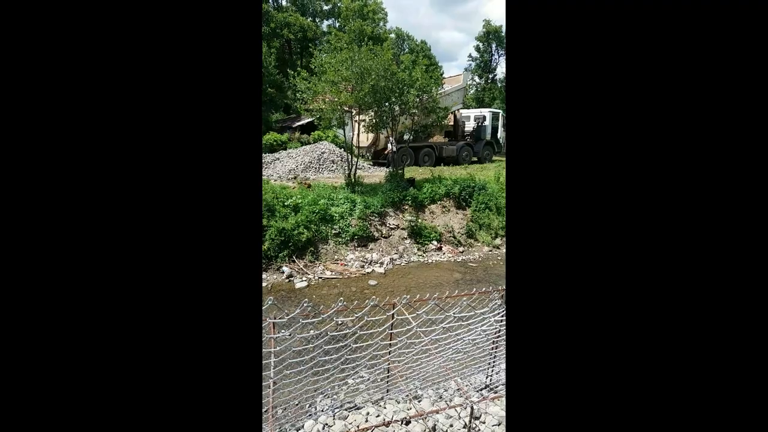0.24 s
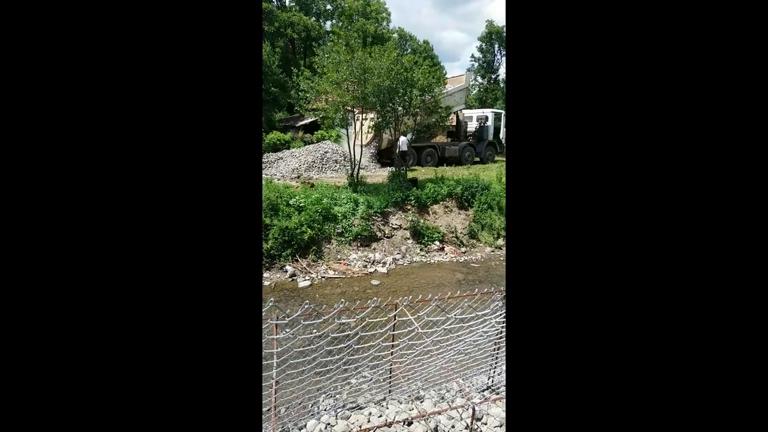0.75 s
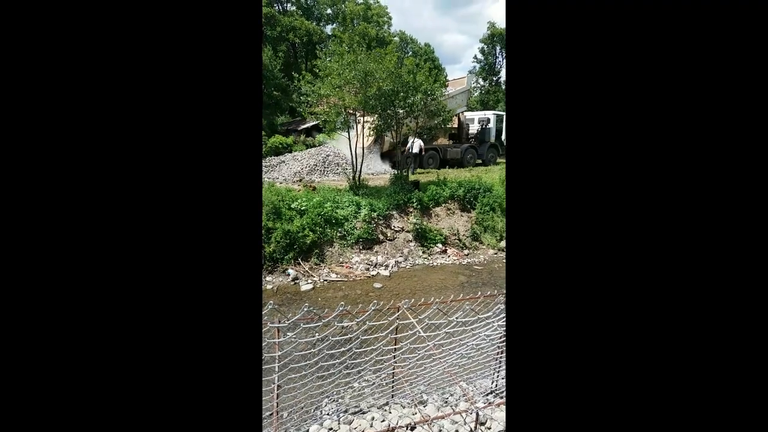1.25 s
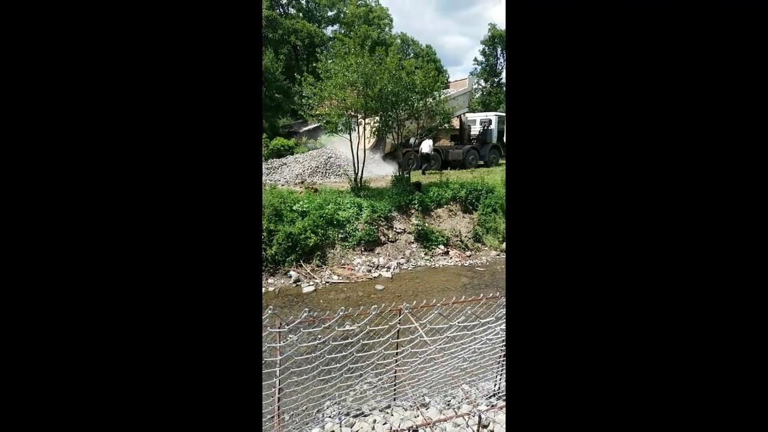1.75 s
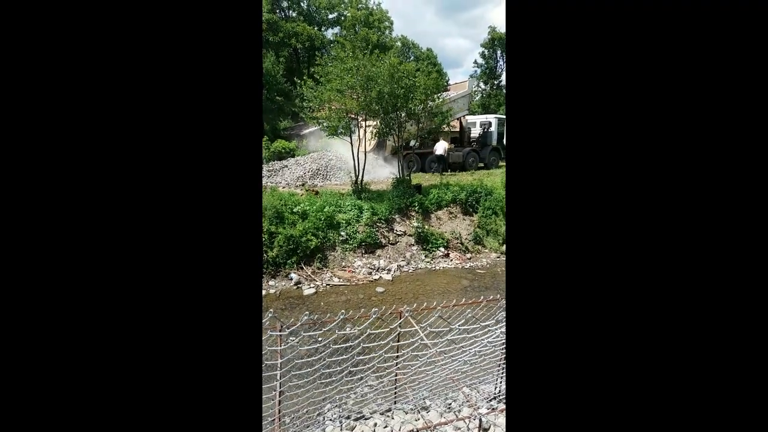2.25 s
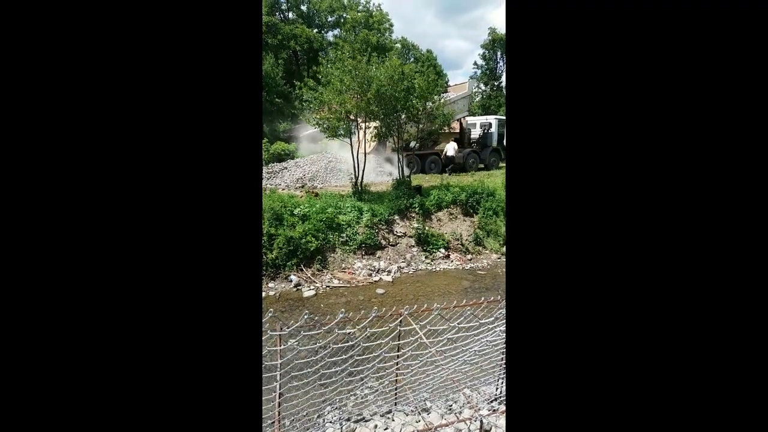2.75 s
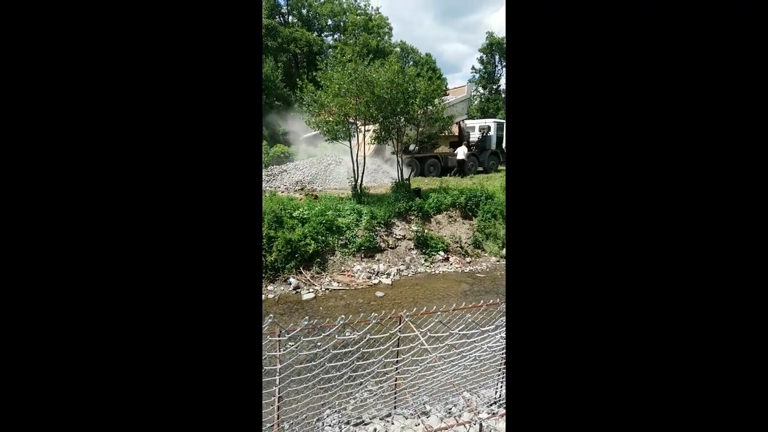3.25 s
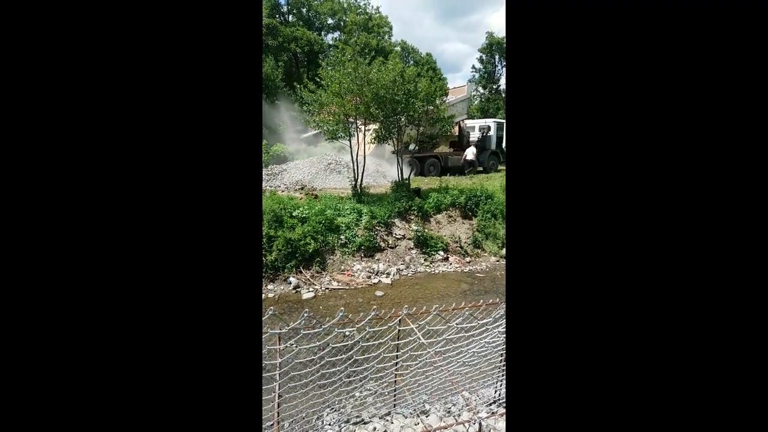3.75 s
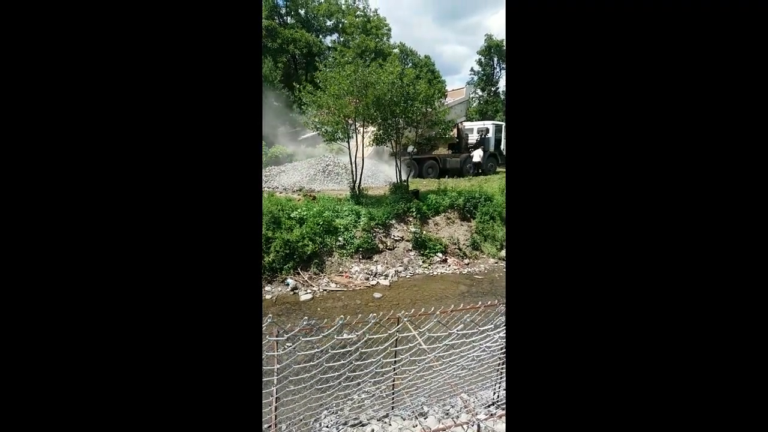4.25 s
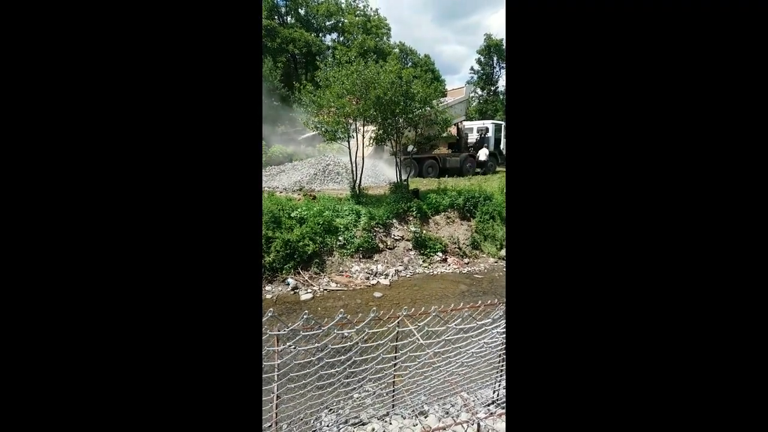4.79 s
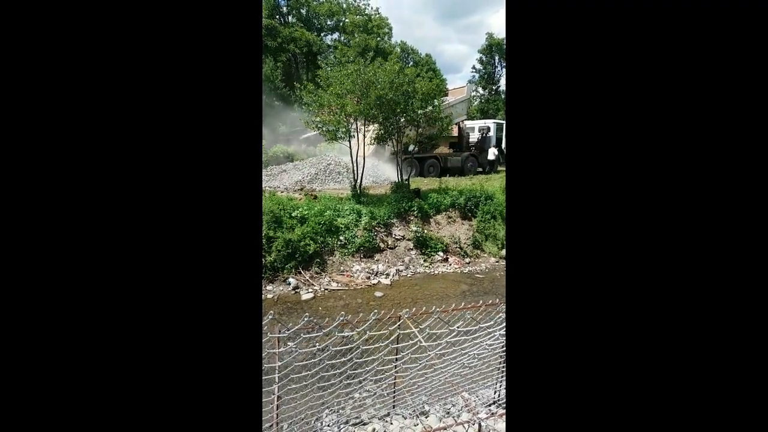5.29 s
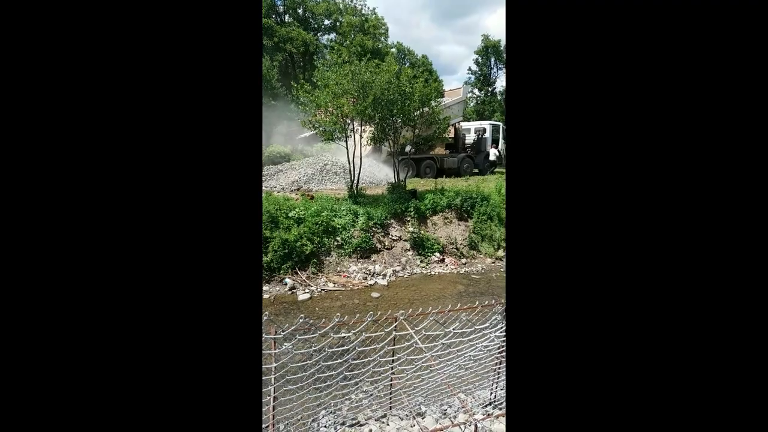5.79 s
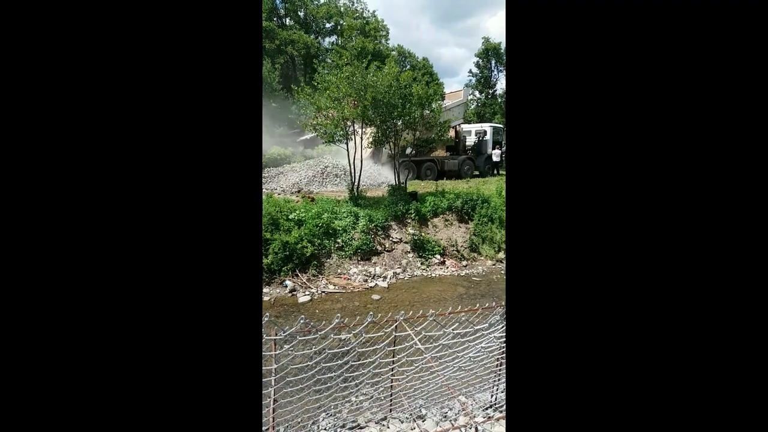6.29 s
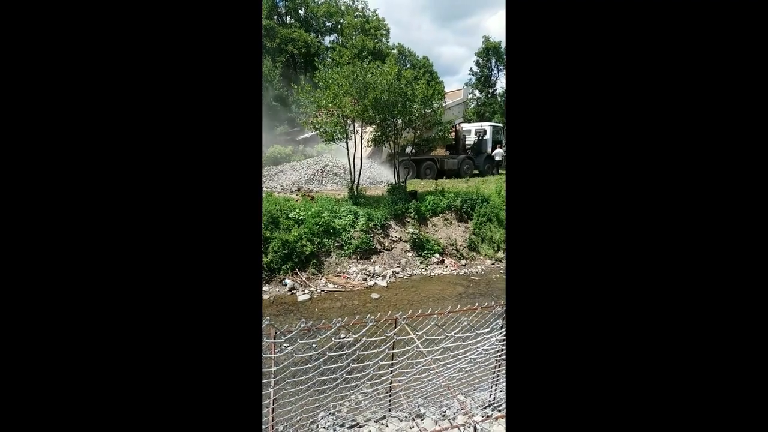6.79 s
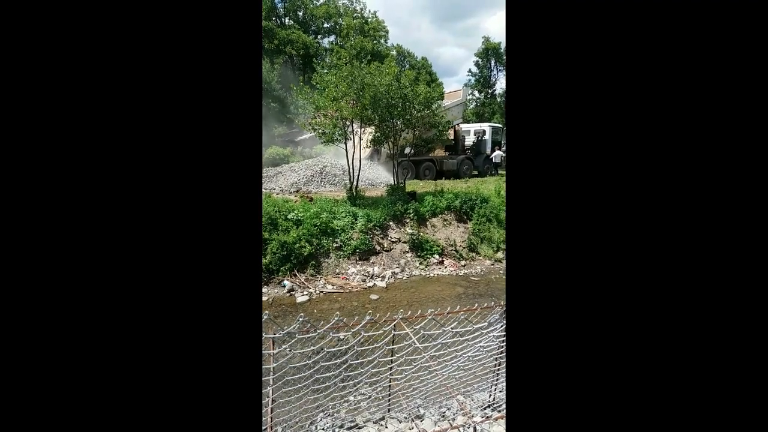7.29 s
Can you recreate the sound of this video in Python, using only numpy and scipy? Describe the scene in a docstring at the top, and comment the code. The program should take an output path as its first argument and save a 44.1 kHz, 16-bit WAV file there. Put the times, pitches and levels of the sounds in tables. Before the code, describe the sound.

Outdoors by a stream, wind thumps the microphone while a small rattle fades. Within half a second a load of rock breaks loose and clatters off a steel truck bed in a dense, harsh rush, with the metal drumming beneath. It thins gradually to grit, sparse knocks and a few ringing chips. Idling diesel and water hiss remain faint behind.

```python
"""Wind thumps and a fading rattle, then thousands of stones clatter off a tipper truck's raised steel bed.
The rush thins out to single knocks; an engine idles, a stream hisses and gusts buffet the microphone.
Stones are random impacts of decaying modes plus snaps; large rocks and chips ring at listed times.
The bed is noise through steel modes; wind, engine and stream are shaped noise."""
import sys
import numpy as np
from scipy import signal
from scipy.fft import rfft, irfft
from scipy.io import wavfile
from scipy.ndimage import uniform_filter1d, minimum_filter1d

SR = 44100
rng = np.random.default_rng(int(sys.argv[2]) if len(sys.argv) > 2 else 0)


def wav_out(sig):
    """Save sig, one row per channel (or a flat mono array), as 16-bit PCM at SR to the path in sys.argv[1]."""
    wavfile.write(sys.argv[1], SR, np.round(np.clip(np.atleast_2d(sig).T, -1, 1) * 32767).astype(np.int16))


N = 332098
T = np.arange(N) / SR
HZ = np.fft.rfftfreq(N, 1 / SR)


def gain_of(db):
    """Decibels to amplitude."""
    return 10 ** (np.asarray(db) / 20)


def evened(x):
    """Scales to rms 1."""
    return x / np.sqrt(np.mean(x ** 2) + 1e-20)


def curve(points):
    """(s, value) points as a curve over time."""
    time_s, values = np.transpose(points)
    return np.interp(T, time_s, values)


def spectrum_gain(points):
    """(Hz, dB) points as a gain at every frequency, straight in dB over log frequency."""
    freq_hz, level_db = np.transpose(points)
    return gain_of(np.interp(np.log(HZ + 1), np.log(freq_hz + 1), level_db))


def resonances(modes):
    """Gain of (Hz, width Hz, dB) modes; dB sets the relative power of each whole mode."""
    power = 0
    for mode_hz, width_hz, level_db in modes:
        power = power + gain_of(level_db) ** 2 / width_hz / (1 + ((HZ - mode_hz) / width_hz) ** 2) ** 2
    return np.sqrt(power)


def filtered(x, gain):
    """Applies a zero-phase gain."""
    return irfft(rfft(x) * gain, N)


def colour(x, gain):
    """Minimum-phase filter: causal, so that attacks stay sharp."""
    log_gain = np.log(np.maximum(gain / gain.max(), 1e-5))
    cepstrum = irfft(log_gain, N)
    cepstrum[1:N // 2] *= 2  # fold onto positive time
    cepstrum[N // 2 + 1:] = 0
    impulse = irfft(np.exp(rfft(cepstrum)), N)[:SR // 4]
    return signal.oaconvolve(x, impulse)[:N]


def noise(gain):
    """Noise of rms 1 with the given spectrum."""
    return evened(filtered(rng.standard_normal(N), gain))


def flutter(rate_hz):
    """Slow random curve of rms 1, low-passed at the given rate."""
    lowpass = signal.butter(N=2, Wn=rate_hz, fs=SR, output="sos")
    return evened(signal.sosfilt(lowpass, rng.standard_normal(N)))


def band_rms(x, lo_hz, hi_hz):
    """Rms of one band."""
    return np.std(filtered(x, (HZ > lo_hz) & (HZ < hi_hz)))


def add(mix, start_s, sound):
    """Mixes a sound in at a time."""
    part = mix[max(round(start_s * SR), 0):][:len(sound)]
    part += sound[:len(part)]


def outdoors(x, wet_db, t60_s, count=8):
    """Bank, trees and truck scatter short, sparse tails, which change at random from moment to moment."""
    t, tail = np.arange(SR // 2) / SR, np.zeros(N)
    tail_choice = np.repeat(rng.integers(0, count, N // 256 + 1), 256)[:N]
    for k in range(count):
        sparse = rng.standard_normal(len(t)) * (rng.random(len(t)) < .05)
        taps = sparse * (t > .004) * gain_of(-60 * t / t60_s)
        share = np.sin(np.pi / 2 * uniform_filter1d(1. * (tail_choice == k), size=128))
        tail += signal.oaconvolve(x * share, taps / np.linalg.norm(taps))[:N]
    return x + gain_of(wet_db) * tail


def stone_levels():
    """Levels in dB of clatter, big stones and grit: all follow the flow, and the big stones come first."""
    # flow of rock off the bed, as relative clatter level: start_s, level_db
    flow = [(0, -33), (.06, -41), (.16, -34.5), (.19, -28), (.42, -22), (.55, -20.5), (.69, -14.5),
            (1.45, -16), (1.8, -18.5), (2.8, -19.5), (3.85, -22.5), (4.3, -25.5), (5.0, -28), (5.76, -27.5),
            (5.86, -31.5), (6.6, -32.3), (7.53, -36)]
    reference_db, pour_s = -19, .18
    big_db, big_db_per_db, big_cap_db = -4.5, 1.15, 2
    big_lead_db, big_lead_decay_s = 9.5, 0.21
    grit_db, grit_db_per_db = -11.5, 1.19
    clatter_db = curve(flow)
    flow_db = clatter_db - reference_db
    lead_db = big_lead_db * np.exp(-np.maximum(T - pour_s, 0) / big_lead_decay_s)
    # only so many big stones pass the gate: above the cap more flow adds nothing
    capped_db = np.minimum(flow_db, big_cap_db)
    big_stones_db = reference_db + big_db + big_db_per_db * capped_db + lead_db
    return clatter_db, big_stones_db, reference_db + grit_db + grit_db_per_db * flow_db


def collisions(per_s, spread_db, t60_2khz_s, crack, low_hz, size=700):
    """Random impacts, each stone with its own size, strength and three unrelated modes."""
    at = np.flatnonzero(rng.random(N) < per_s / SR)
    smallness, force, second, third, sign = rng.random((len(at), 5)).T[:, :, None]
    t = np.arange(size) / SR
    hz = low_hz * (SR / 4 / low_hz) ** smallness
    modes_hz = [hz, hz * (1.25 + .3 * second), hz * (1.6 + .4 * third)]
    # small stones ring higher and shorter
    decay = gain_of(-60 * t / t60_2khz_s * np.sqrt(hz / 2000))
    ring = sum(np.sin(np.float32(2 * np.pi * f * t)) for f in modes_hz) * decay
    snap = rng.standard_normal(ring.shape) * np.exp(-t / 0.0011)
    strength_db = spread_db * np.minimum(-np.log(1 - force), 4)
    blow = gain_of(strength_db) * np.sign(sign - .5)
    stones = blow * (evened(ring) + crack * evened(snap))
    sample = at[:, None] + np.arange(size)
    spectrum = rfft(np.bincount(sample.ravel(), stones.ravel(), N)[:N])
    # whiten all sizes together, ready for the colour of the rock
    smooth_power = uniform_filter1d(abs(spectrum) ** 2, size=4000)
    return evened(irfft(spectrum / np.sqrt(smooth_power), N))


def slide():
    """The rock avalanche: the stronger the flow, the denser the collisions."""
    # spectrum of rock on rock: freq_hz, relative_level_db
    stone = [(290, -31.5), (500, -8.5), (561, -16), (781, -2), (851, -3.5), (941, -1), (1170, -4.5),
             (2230, -5.5), (2760, -9), (4440, -13), (5280, -20), (6550, -30), (9370, -50), (13400, -45.5),
             (15500, -61)]
    # peaks and dips in the colour of the clatter: center_hz, width_hz, gain_db
    peaks_and_dips = [(810, 87, 2), (955, 130, 2.5), (1172, 190, -2.5), (2100, 920, 8.5), (3100, 590, 4),
                      (3360, 510, -3.5), (4600, 700, 0), (5180, 320, -7.5), (10300, 1400, -3)]
    # top treble against the rest of the grit: start_s, level_db
    sizzle = [(.54, -17), (.66, 0), (1.8, 3), (3.1, 4.5), (4.4, -0.5), (6.5, 0)]
    surge_db, surge_hz = 1.0, 12
    clatter_db, big_db, grit_db = stone_levels()
    density = np.maximum(gain_of(.8 * (clatter_db - clatter_db.max())), .13)
    hits = collisions(3400 * density, spread_db=2.5, t60_2khz_s=0.027, crack=0.65, low_hz=651.3)
    # stones arrive in clumps; a thin flow is more uneven
    surges = gain_of(surge_db * (0.7 - density) * flutter(surge_hz))
    # undo the loudness that density brings: the levels come last
    hits = outdoors(evened(surges * hits / np.sqrt(density)), wet_db=0.0, t60_s=0.4)
    peaks_and_dips_db = sum(db * np.exp(-(2 * (HZ - f) / w) ** 2) for f, w, db in peaks_and_dips)
    whole = colour(hits, spectrum_gain(stone) * gain_of(peaks_and_dips_db))
    # big stones sound below the main clatter, grit above it
    big_band = 1 / (1 + (HZ / 1400) ** 6)
    grit_band = 1 - 1 / (1 + (HZ / 3300) ** 8)
    big = filtered(whole, big_band) / band_rms(whole, 650, 1300)
    clatter = filtered(whole, 1 - big_band - grit_band) / band_rms(whole, 1500, 3200)
    grit = filtered(whole, grit_band) / band_rms(whole, 3500, 9000)
    coarse = filtered(grit, 1 / (1 + (HZ / 8000) ** 12))
    grit = coarse + (grit - coarse) * gain_of(curve(sizzle))
    return big * gain_of(big_db) + clatter * gain_of(clatter_db + 0.52) + grit * gain_of(grit_db)


def splinters(per_s=50, spread_db=3.5, t60_s=0.034, level_db=-6.0, follow_db_per_db=0.81):
    """Small splinters snap at random above the rush; the air dulls the highest."""
    grit_db = stone_levels()[2]
    out, t = np.zeros(N), np.arange(SR // 20) / SR
    at = np.flatnonzero(rng.random(N) < per_s / SR)
    for i, (pitch, force) in zip(at, rng.random((len(at), 2))):
        hz = 3500 * 3 ** pitch
        db = level_db + follow_db_per_db * grit_db[i] + spread_db * min(-np.log(1 - force), 3)
        snap = np.sin(2 * np.pi * hz * t) + 1.24 * rng.standard_normal(len(t))
        add(out, i / SR, gain_of(db - 60 * t / t60_s) * snap)
    return colour(out, spectrum_gain([(1000, -22), (3000, 2), (4700, 2.5), (6500, -9), (8000, -17),
                                      (10000, -27.5), (13000, -25.0), (16000, -34)]))


def bed(gate_hz=311, gate_width_hz=7):
    """Countless blows keep the steel bed ringing over a rumble; the tailgate rings as rock pushes under it."""
    # modes of the steel bed: mode_hz, width_hz, relative_level_db
    bed_modes = [(97, 14, -7.5), (243.8, 7.5, 2.5), (262, 34, -7), (340, 34, -19.5), (388, 17, -16),
                 (405, 23, -8.5), (444.4, 4.6, -6), (513, 64, -6.5), (600.4, 12, -9), (643, 11, -16.5),
                 (768, 16, -11)]
    # ringing of the tailgate: start_s, level_db
    tailgate = [(0, -48), (.55, -24.5), (1.25, -27.5), (1.6, -18.5), (1.78, -29), (3.1, -52), (4.5, -37.5),
                (5.6, -52), (7.53, -52)]
    # drumming swells, holds while the bed is full, fades as it empties
    drum_full_db, drum_last_db = -25, -49
    full_s, emptying_s = 0.39, 1.75
    rise_db_per_s, fade_db_per_s = 22, 5.5
    swell_db = rise_db_per_s * np.minimum(T - full_s, 0)
    fade_db = fade_db_per_s * np.maximum(T - emptying_s, 0)
    drum_db = np.maximum(drum_full_db + swell_db - fade_db, drum_last_db)
    rumble = noise(spectrum_gain([(30, -18), (70, -7), (180, 4.0), (350, 7.5), (550, -7.0),
                                  (900, -33), (2500, -54)]))
    drumming = gain_of(-0.5) * noise(resonances(bed_modes)) + gain_of(-1.0) * rumble
    gate = noise(resonances([(gate_hz, gate_width_hz, 0)]))
    return gain_of(drum_db) * drumming + gain_of(curve(tailgate)) * gate


def knocks():
    """Large rocks land, ring briefly in three unrelated modes and crunch the stones beneath them."""
    # single rocks landing; the first row is a fading rattle of stones:
    # start_s, relative_peak_db, pitch_hz, crunch_t60_s
    knock_rows = [(0.003, -25, 4570, 0.25), (0.171, -15, 4160, 0.2), (0.414, -7.5, 1600, 0.35),
                  (2.502, -6, 2100, 0.049), (2.757, -10.5, 2160, 0.039), (3.133, -21, 2100, 0.029),
                  (3.345, -13, 1020, 0.082), (3.458, -16, 2000, 0.045), (3.82, -14, 6500, .03),
                  (3.864, -12, 1930, 0.051), (4.2, -15, 3800, .07), (4.275, -12.5, 1020, 0.035),
                  (4.384, -14.5, 3900, 0.054), (4.568, -17, 2150, 0.085), (4.754, -16, 4300, 0.039),
                  (4.877, -11, 2280, 0.023), (5.159, -12.5, 1700, 0.05), (5.3, -11.5, 2090, 0.048),
                  (5.387, -11.5, 2250, 0.047), (5.503, -13.5, 885, 0.08), (6.108, -17.5, 4270, .07),
                  (6.111, -15, 2300, 0.15), (6.428, -10.5, 1080, 0.055), (6.449, -21, 3560, 0.026),
                  (6.518, -21, 5300, .03), (6.543, -16, 1220, 0.12), (6.729, -19, 1900, 0.04),
                  (6.801, -17, 2180, 0.029), (6.979, -22, 1080, .12), (7.055, -19.5, 950, 0.16),
                  (7.117, -12, 1584, 0.16), (7.3, -21.5, 900, 0.15), (7.359, -17.5, 960, 0.11),
                  (7.363, -24, 4340, 0.06)]
    out, t = np.zeros(N), np.arange(SR // 4) / SR
    for start_s, peak_db, pitch_hz, t60_s in knock_rows:
        attack = 1 - np.exp(-t / 0.00051)
        crunch = rng.standard_normal(len(t)) * gain_of(-60 * t / t60_s) * attack
        body = signal.lfilter(*signal.iirpeak(min(pitch_hz, SR / 3), 2.2, fs=SR), crunch)
        modes_hz = pitch_hz * np.array([rng.uniform(.7, .9), 1, rng.uniform(1.15, 1.5)])
        tones = np.array([.5, 1, .5]) @ np.sin(2 * np.pi * modes_hz[:, None] * t)
        ring = tones * gain_of(-60 * t / 0.027)
        knock = evened(body) + 0.61 * evened(ring) + 0.36 * evened(crunch)
        add(out, start_s, gain_of(peak_db) * knock / abs(knock).max())
    far = colour(out, 1 / (1 + (HZ / 5100) ** 8))  # distance dulls the crack
    return gain_of(0.5) * outdoors(far, wet_db=-5.5, t60_s=0.31)


def clinks():
    """Hard chips ring out above the clatter, each a decaying sine."""
    # ringing chips: start_s, relative_level_db, pitch_hz, t60_s
    chips = [(1.535, -20, 6420, 0.025), (2.479, -38, 13000, .04), (2.559, -39, 13400, .04),
             (2.866, -27.5, 6600, 0.048), (2.89, -33, 5660, 0.13), (3.098, -38, 12500, .025),
             (3.82, -34.5, 6800, 0.028), (3.823, -37, 8350, .025), (4.877, -29.5, 5600, 0.044),
             (4.88, -34, 3830, 0.12), (5.1, -27, 4700, 0.056), (6.777, -32, 4600, 0.068),
             (6.835, -17.5, 4520, 0.045)]
    out, t = np.zeros(N), np.arange(SR // 4) / SR
    for start_s, level_db, pitch_hz, t60_s in chips:
        ring = np.sin(2 * np.pi * pitch_hz * t) * (1 - np.exp(-t / 0.0016))
        add(out, start_s, gain_of(level_db + 2.5 - 60 * t / t60_s) * ring)
    return outdoors(out, wet_db=-22, t60_s=0.13)


def wind():
    """A fluttering breeze and single gusts buffet the microphone; a gust reaches higher in pitch at its crest."""
    # spectrum of the buffeting: freq_hz, relative_level_db
    buffet = [(20, -40), (32, -49), (48, -7), (70, 1), (105, 1), (170, -3), (280, -11.5), (450, -22),
              (800, -40), (2000, -94)]
    # spectrum of the gust crests: freq_hz, relative_level_db
    crest_spectrum = [(25, -37), (60, 10), (130, -1), (280, 6.5), (550, -7.5), (900, -28), (2500, -99)]
    # thumping gusts (crest_db is added to level_db): center_s, relative_level_db, half_length_s, crest_db
    gusts = [(0.01, -16, 0.045, -3.5), (0.147, -16, 0.013, -2.5), (0.385, -16, 0.019, 6),
             (0.818, -17, 0.07, -24), (1.417, -15, .035, -7), (1.861, -13, 0.017, -13),
             (2.16, -13.5, 0.065, -11.5), (3.72, -27, 0.096, -16), (3.969, -18.5, 0.008, -3),
             (4.06, -21, 0.012, -21), (4.162, -23, .018, -6), (4.577, -18, 0.015, -18),
             (4.639, -9, 0.013, -10), (4.729, -17, 0.03, -9), (4.913, -22, 0.0097, -8),
             (5.081, -15, 0.041, 2.5), (5.186, -22, 0.027, -18), (5.318, -18, 0.074, -7.5),
             (6.187, -27.5, 0.026, -16), (6.32, -31, .015, -12), (6.426, -20, 0.015, -15),
             (6.574, -26.5, 0.062, -7), (6.862, -27.5, 0.023, -7), (7.123, -29, 0.021, -4),
             (7.244, -31, 0.038, -9)]
    # breeze between gusts: start_s, relative_level_db
    breeze = [(0, -18.5), (1.2, -22.5), (2.36, -24.5), (2.45, -33), (3.0, -33), (3.3, -34), (4.1, -27),
              (4.85, -32), (5.53, -32.5), (5.7, -48), (6.1, -49), (6.6, -37.5), (7.53, -41)]
    eddy_rms_db, eddy_hz = 3, 25
    power = gain_of(curve(breeze) + eddy_rms_db * flutter(eddy_hz)) ** 2
    crest = np.zeros(N)
    for center_s, level_db, half_s, crest_db in gusts:
        swell = np.exp(-((T - center_s) / half_s) ** 2 / 2)
        power += (gain_of(level_db) * swell) ** 2
        crest += gain_of(level_db + crest_db) * swell ** 2
    buffeting = np.sqrt(power) * noise(spectrum_gain(buffet))
    crests = crest * noise(spectrum_gain(crest_spectrum))
    return gain_of(-0.5) * buffeting + gain_of(-2.0) * crests


def engine():
    """Far drone of the idling diesel: noise through steady resonances."""
    # engine resonances: mode_hz, width_hz, relative_level_db
    engine_modes = [(67, 15, 0), (113, 29, 1), (156, 25, -9), (233, 17, 4.5), (311, 46, 9.5), (377, 53, 2)]
    return gain_of(-39.0) * noise(resonances(engine_modes))


def stream():
    """Even hiss of the stream: steady shaped noise."""
    # spectrum of the water: freq_hz, relative_level_db
    water = [(100, -34), (300, -5), (560, -14), (900, 1), (1250, 3.5), (2100, -2), (4500, -27), (7000, -52),
             (10000, -42), (13500, -48), (16000, -62)]
    return gain_of(-40) * noise(spectrum_gain(water))


def scene():
    """Everything as it reaches one microphone."""
    rock = slide() + splinters() + bed() + knocks() + clinks()
    return (rock + wind() + engine() + stream())[None]


def record(dry):
    """A quick limiter holds the highest peaks; then a soft start and the band limit."""
    edge_hz = 15600
    needed = np.minimum(1, .93 / (abs(dry) + 1e-9))
    held = dry * uniform_filter1d(minimum_filter1d(needed, size=129), size=129)
    held = held * np.sin(np.pi / 2 * np.minimum(T / .004, 1)) ** 2
    lowpass = signal.firwin(511, edge_hz, window=("kaiser", 9), fs=SR)
    return signal.oaconvolve(held, lowpass[None], "same")


dry = scene()
out = record(dry)
wav_out(out)
```